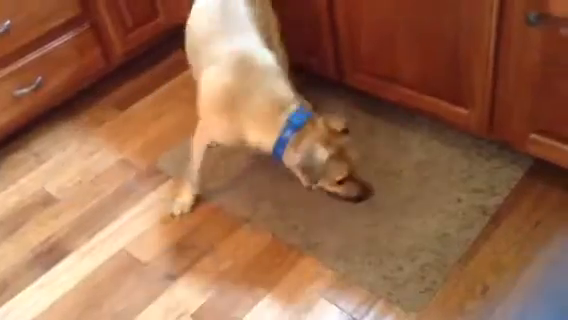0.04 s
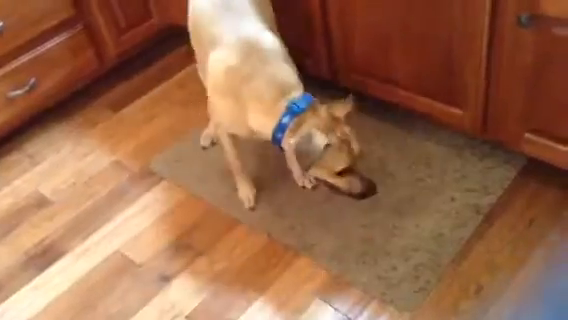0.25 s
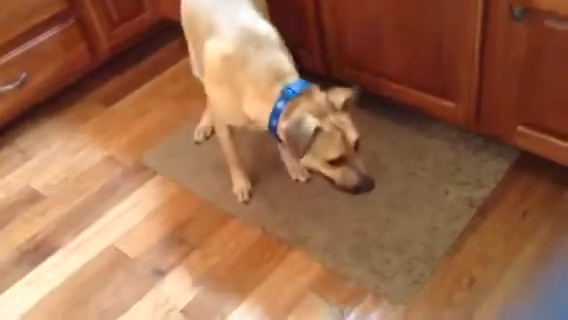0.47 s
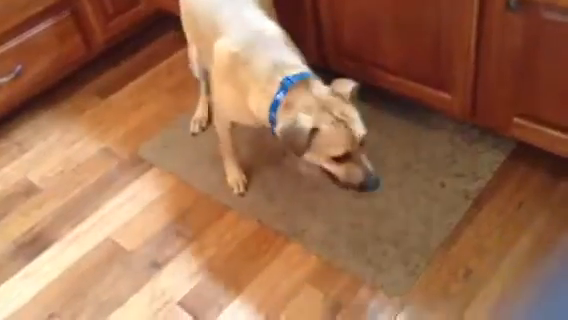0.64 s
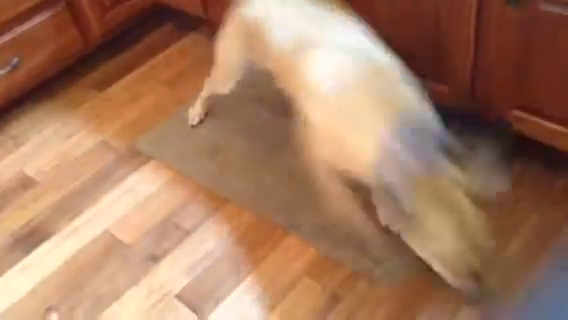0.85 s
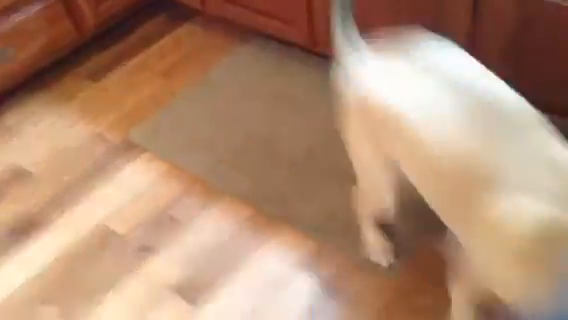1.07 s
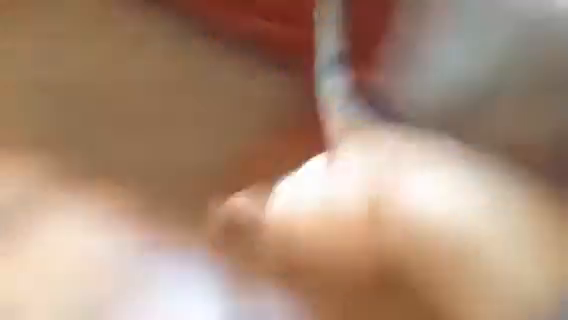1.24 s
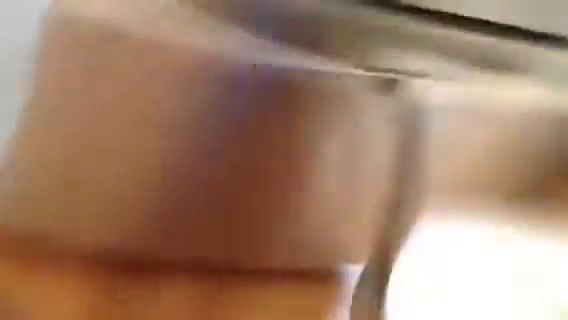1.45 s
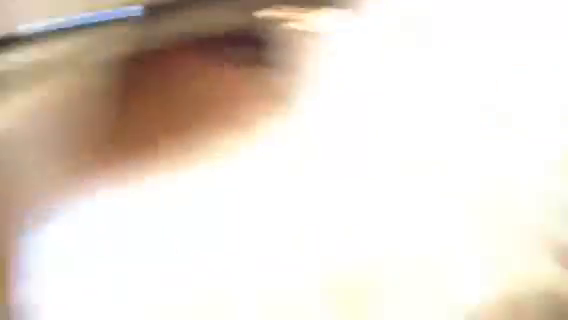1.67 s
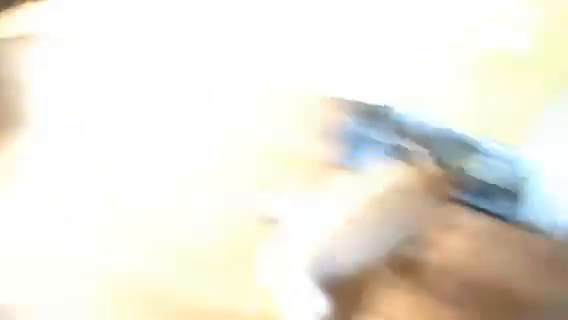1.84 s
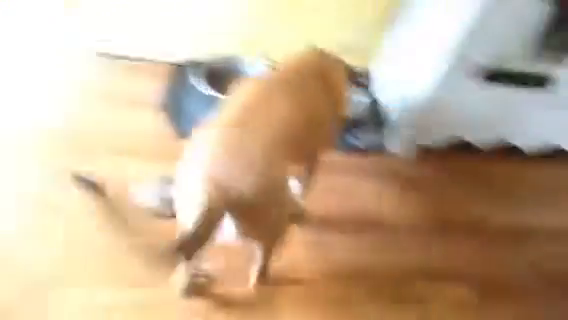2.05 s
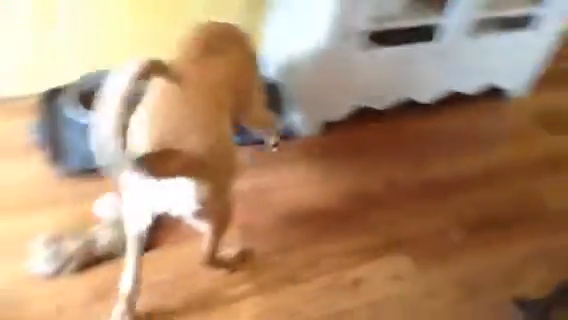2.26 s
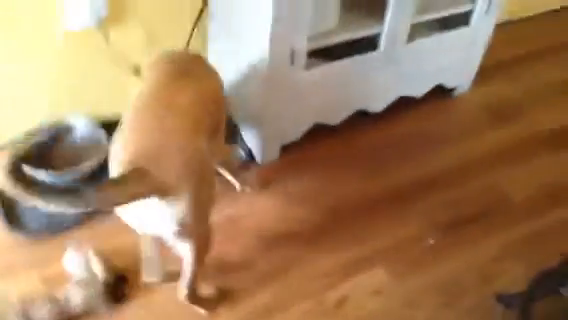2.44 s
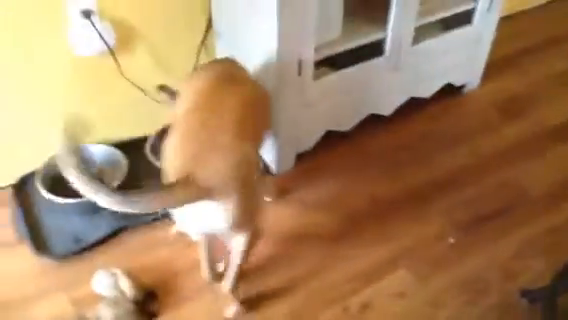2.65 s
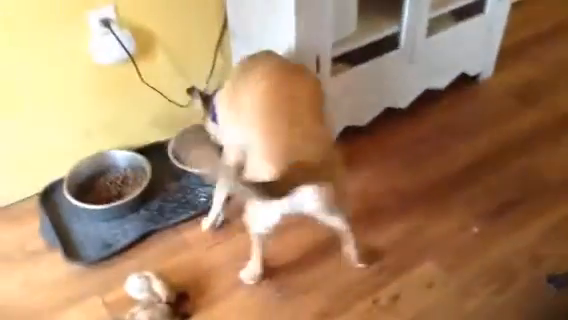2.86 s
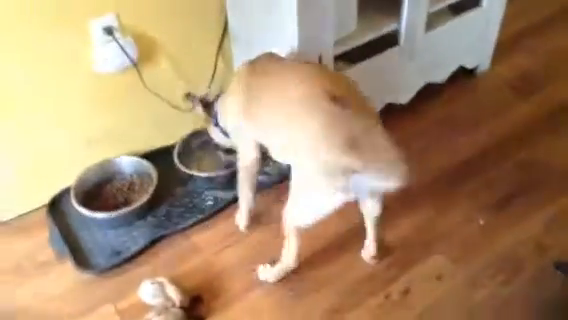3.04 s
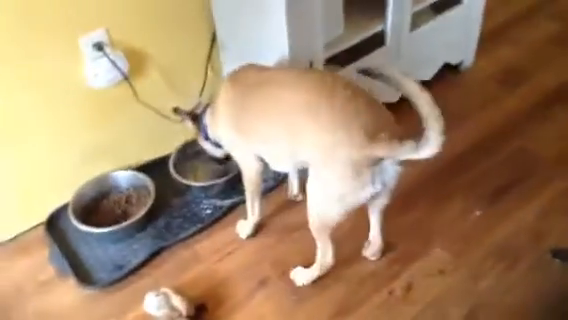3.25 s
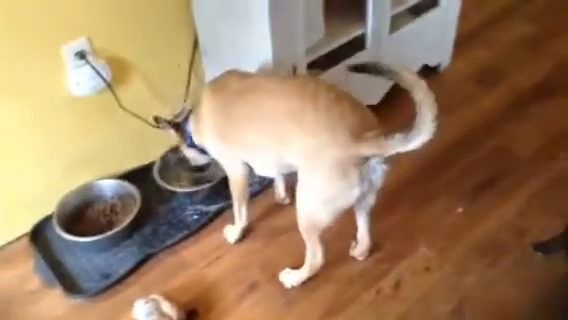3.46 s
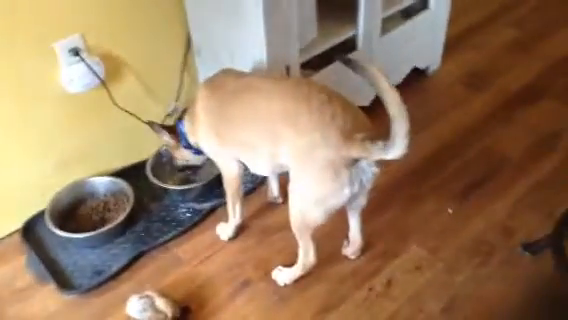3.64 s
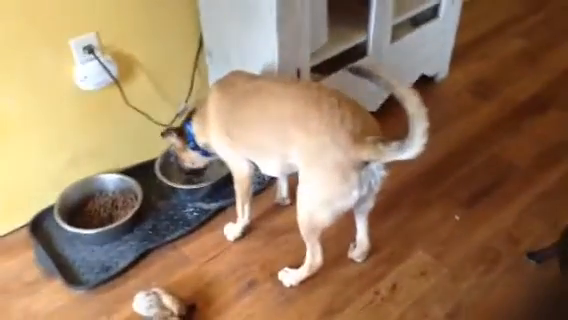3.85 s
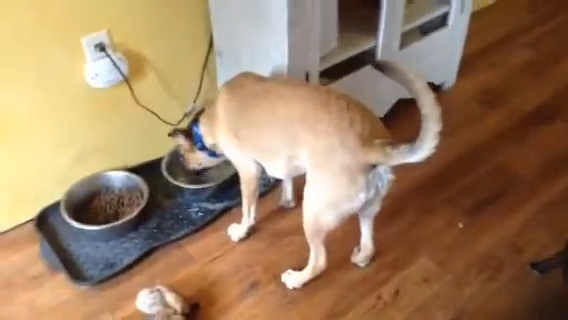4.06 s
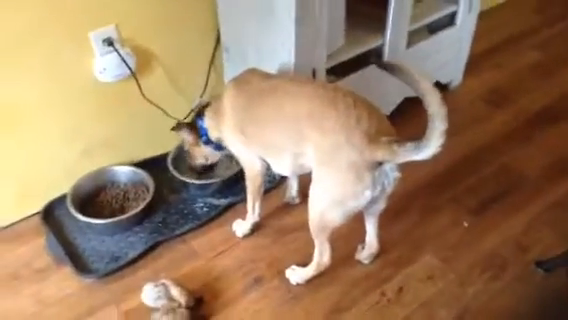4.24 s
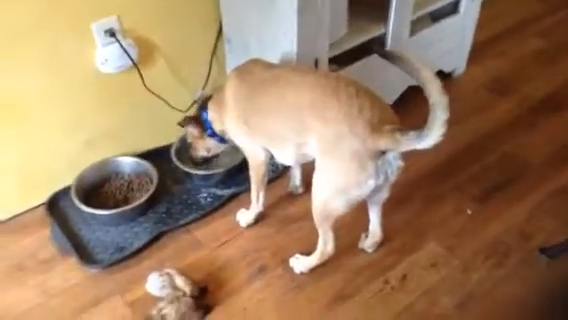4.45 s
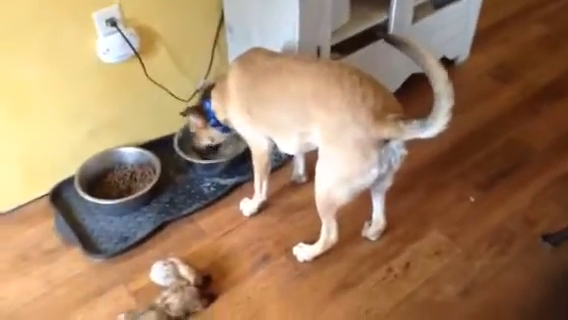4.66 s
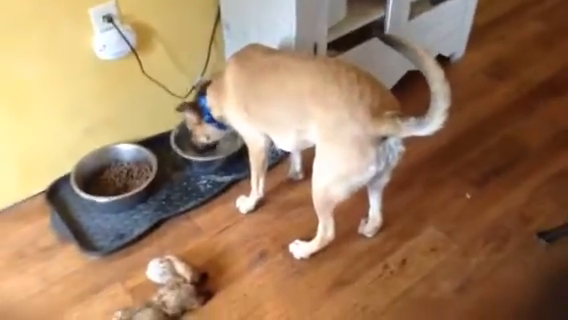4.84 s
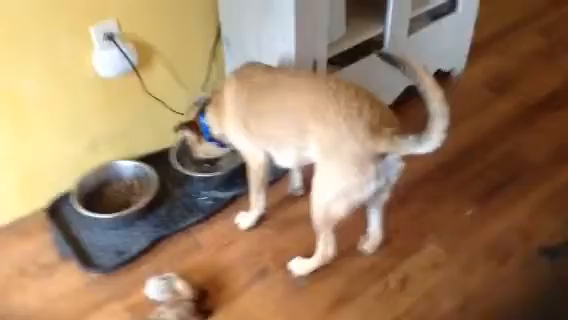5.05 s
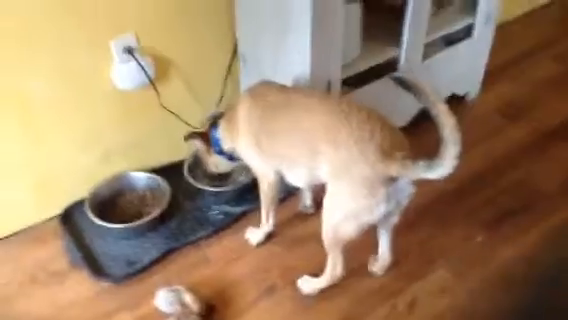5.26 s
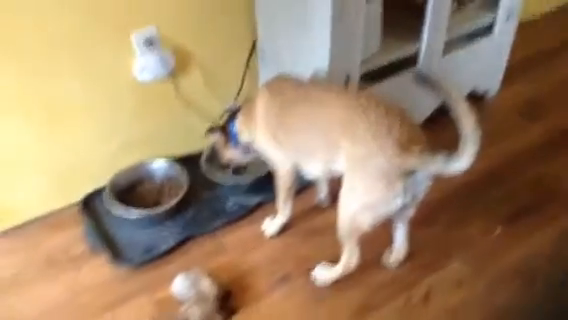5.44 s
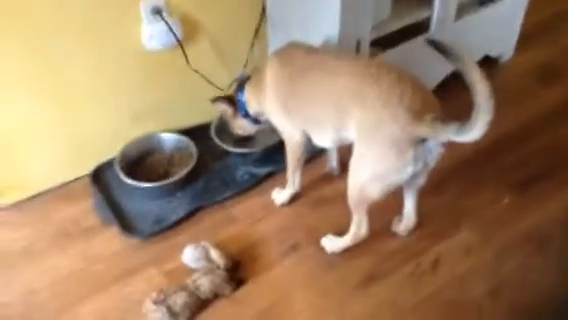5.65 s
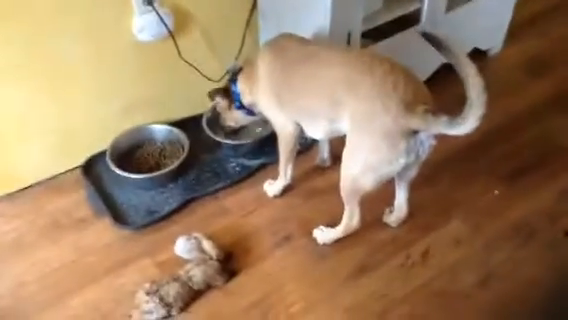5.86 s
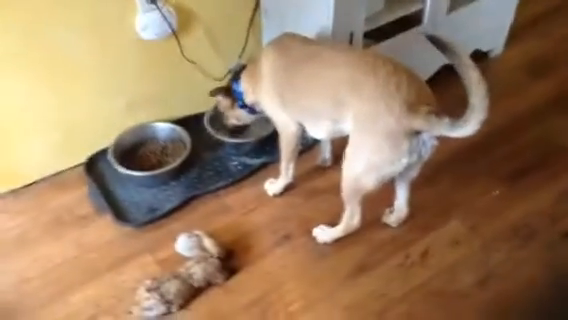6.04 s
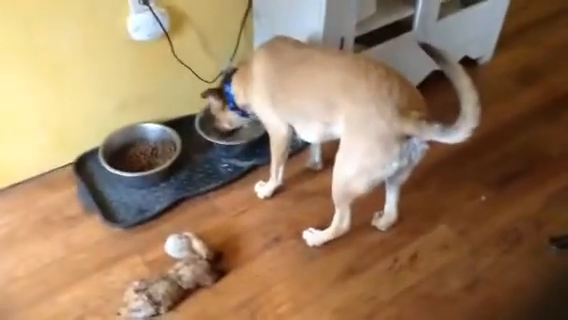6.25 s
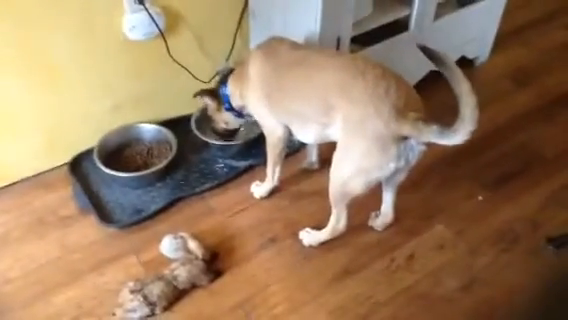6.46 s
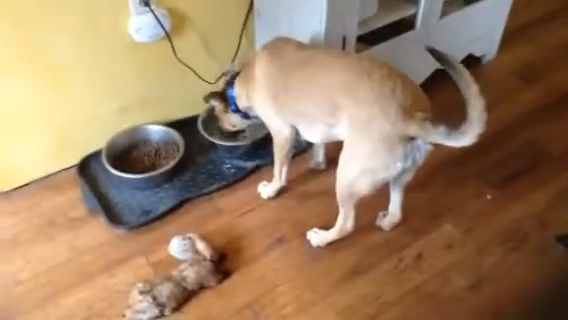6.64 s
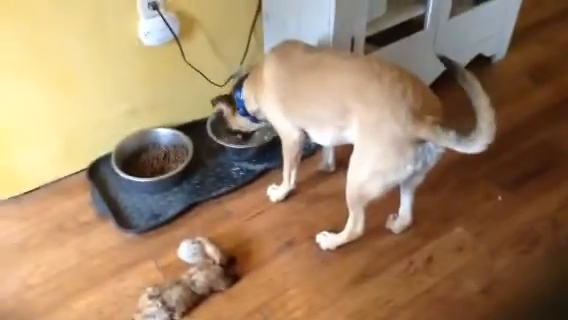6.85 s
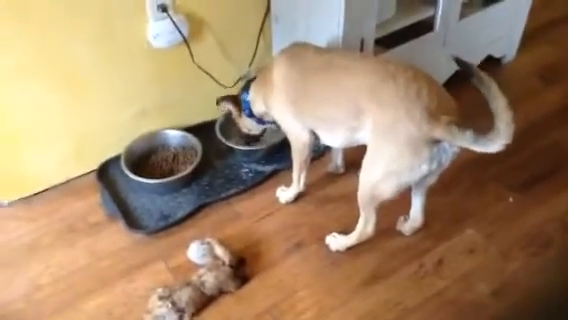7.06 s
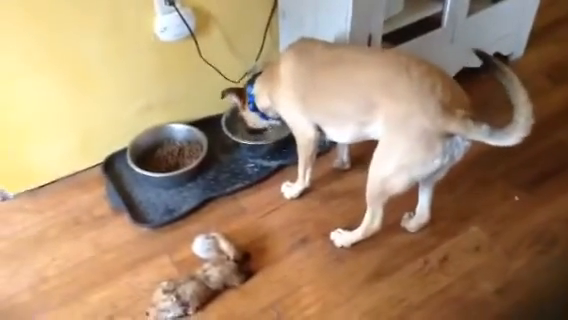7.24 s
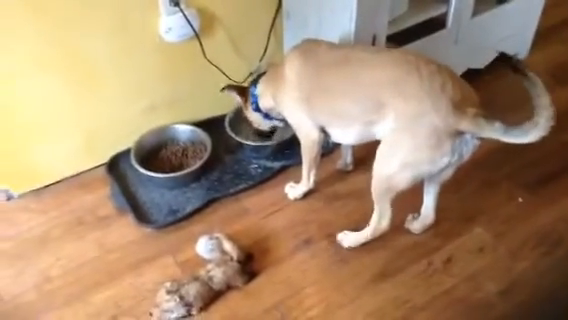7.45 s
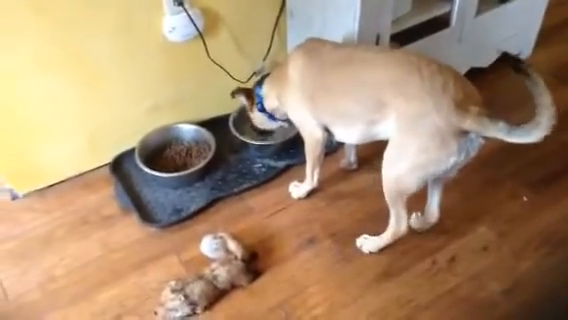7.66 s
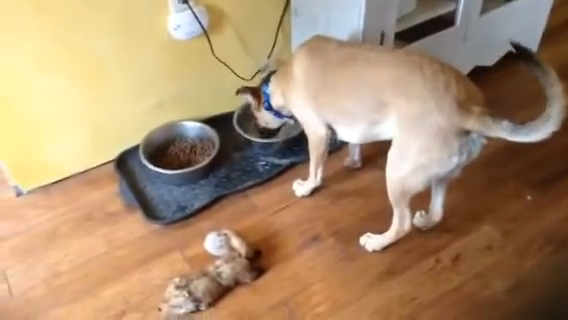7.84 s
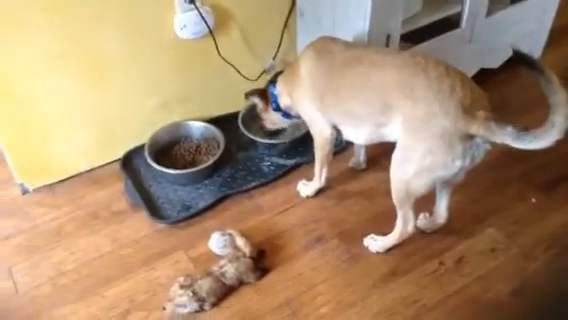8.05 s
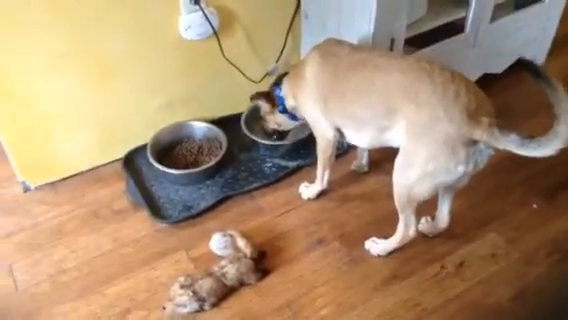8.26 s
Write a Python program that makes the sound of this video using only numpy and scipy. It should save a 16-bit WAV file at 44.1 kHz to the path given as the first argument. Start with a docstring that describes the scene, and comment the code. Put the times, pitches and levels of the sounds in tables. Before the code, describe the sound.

In a hard, lively kitchen, a dog shuffles softly on a mat, then bolts over wooden boards with heavy thumps, bright claw scrapes and a brief tag tinkle. After a short lull it laps water from a small metal bowl in quick, plopping slurps. A faint appliance hum stays below; the hand-held microphone picks up ticks and bumps.

```python
"""Dog drinking in a kitchen

A dog shuffles on a mat, scrambles over a wooden kitchen floor and laps water from a steel bowl.
Paws ring the board modes, skids and claws are dense random clicks, a tag is a few dying sines.
A lap is a slap of the tongue and a pull that traps air pockets, sines of rising pitch, amid spray and fizz.
The hard room is a noise tail that draws each sound out; an appliance hums below in wavering sines.
The hand-held microphone picks up dry ticks, knocks, hollow bumps and a brushing rustle from close by."""
import sys
import numpy as np
from scipy import signal
from scipy.fft import rfft, irfft, next_fast_len
from scipy.io import wavfile
from scipy.ndimage import uniform_filter1d

SR = 44100
rng = np.random.default_rng(int(sys.argv[2]) if len(sys.argv) > 2 else 0)


def decibels_to_gain(level_db):
    """Convert a level in decibels to a linear amplitude gain (20 dB per decade)."""
    exponent = np.asarray(level_db, float) / 20
    return 10 ** exponent


def dump_mix(stems):
    """Bounce the given channels to the path in sys.argv[1] as a 16-bit WAV at rate SR."""
    frames = np.atleast_2d(stems).T  # one column per channel
    limited = np.clip(frames, -1, 1)  # hard clip at full scale
    pcm = np.round(limited * 32767).astype(np.int16)
    wavfile.write(sys.argv[1], SR, pcm)


N = 366030   # samples


def rms_one(x):
    """Scale to unit rms."""
    return x / np.sqrt(np.mean(x ** 2) + 1e-20)


def peak_one(x):
    """Scale to unit height."""
    return x / (np.abs(x).max() + 1e-20)


def crest_rms(x):
    """Scale a burst to unit rms over its first 10 ms."""
    return x / np.sqrt(np.mean(x[:SR // 100] ** 2) + 1e-20)


def in_time(rows):
    """Columns of a level curve at every sample; silent outside it."""
    s, *columns = np.transpose(rows)
    t = np.arange(N) / SR
    return [np.interp(t, s, column, left=-200, right=-200) for column in columns]


def at_hz(points, hz):
    """Read a table on a log-frequency axis."""
    table_hz, db = np.array(points)[:, 0], np.array(points)[:, 1]
    return np.interp(np.log(hz), np.log(table_hz), db)


def colour(x, spectrum):
    """Shape a steady stream by a spectrum; rms 1."""
    size = next_fast_len(len(x))
    hz = np.arange(size // 2 + 1) * SR / size + 1
    shaped = rfft(x, size) * decibels_to_gain(at_hz(spectrum, hz))
    return rms_one(irfft(shaped, size)[:len(x)])


def band(x, low_hz, high_hz):
    """Butterworth band-pass."""
    edges_hz = [low_hz, min(high_hz, SR / 2.1)]
    return signal.sosfilt(signal.butter(2, edges_hz, "band", fs=SR, output="sos"), x)


def one_sided(x, order, hz, side):
    """Butterworth filter that keeps the "low" or the "high" side of a frequency."""
    return signal.sosfilt(signal.butter(order, hz, side, fs=SR, output="sos"), x)


def grains(per_s, spread_db, size=N):
    """Random clicks of random sign, a few much larger than the rest."""
    sizes = decibels_to_gain(spread_db * np.minimum(rng.exponential(1, size), 5))
    signs = rng.choice([-1, 1], size)
    return sizes * signs * (rng.random(size) < per_s / SR) + 1e-18


def ringing(hz, t60, rise=0., swell_s=0.000086, size=6000):
    """A dying sine that swells in quickly; its pitch climbs by the share rise over its t60."""
    t = np.arange(size) / SR
    tone = np.sin(2 * np.pi * hz * (t + rise * t ** 2 / (2 * t60)))
    return tone * decibels_to_gain(-60 * t / t60) * (1 - np.exp(-t / swell_s))


def burst(length_s, size=6000):
    """Envelope with a fast rise that falls 20 dB in length_s."""
    t = np.arange(size) / SR
    return (1 - np.exp(-t / 0.0015)) * decibels_to_gain(-20 * t / max(length_s, .002))


def swells(times, levels_db, rises_s, holds_s, fade_db_per_s):
    """Level in dB of overlapping events that rise, hold and fade; their powers add."""
    t, power = np.arange(0, N + 32, 32) / SR, 1e-20
    for s, db, rise_s, hold_s in np.broadcast(times, levels_db, rises_s, holds_s):
        rise = np.clip((t - s) / max(rise_s, .001), 0, 1)
        fade_db = fade_db_per_s * np.maximum(t - s - rise_s - hold_s, 0)
        power = power + (rise * decibels_to_gain(db - fade_db)) ** 2
    return np.interp(np.arange(N) / SR, t, 10 * np.log10(power))


def add(out, s, piece):
    """Mix a piece in at a time."""
    i = max(round(s * SR), 0)
    out[i:i + len(piece)] += piece[:N - i]


# air noise of the room: (frequency [Hz], density [dB per Hz, relative])
AIR = [(18, -61), (30, -31), (75, -28), (174, 2), (364, 1), (600, -9.5), (702, -5), (866, -5), (1250, -10),
       (2350, -10.5), (3220, -17.5), (13300, -24.5), (14800, -22.5), (16000, -43)]
# appliance hum lines, before the turn: (frequency [Hz], level [dB rms])
HUM = [(120, -76), (275, -66), (365, -67), (705, -69.5)]
# the microphone turns towards the appliance and away: (time [s], gain [dB])
TURN = [(0, 1.5), (1.3, -2), (2.2, 1), (8.3, -1.5)]


def room_tone():
    """Steady air noise and a hum whose lines waver a little in level and phase."""
    t = np.arange(N) / SR
    out = decibels_to_gain(-56.5) * colour(rng.standard_normal(N), AIR)
    for hz, db in HUM:
        waver = rms_one(uniform_filter1d(rng.standard_normal(N), size=6000))
        line = np.sqrt(2) * np.sin(2 * np.pi * hz * t + 0.63 * waver)
        out += decibels_to_gain(db + in_time(TURN)[0]) * (1 + 0.17 * waver) * line
    return out


# paws landing on the boards:
# (time [s], thump level [dB], thump pitch [Hz], board knock level [dB], favoured knock pitch [Hz])
PAWS = [(0.0, -51, 327, -32.5, 800), (.04, -55, 296, -37, 1190), (.809, -27, 223, -22, 1360),
        (1.033, -35, 353, -37.5, 724), (1.101, -33, 196, -32, 3000), (1.157, -24, 246, -62, 540),
        (1.429, -18.5, 236, -27.5, 540), (1.446, -20, 180, -21, 540), (1.466, -41, 220, -24, 1500),
        (1.582, -24.5, 308, -25, 540), (1.664, -23, 204.5, -14, 730), (1.794, -28, 316, -25.5, 990),
        (1.829, -36, 169.5, -39, 1000), (2.143, -41, 336, -40, 1280)]
# modes of the wooden boards: (frequency [Hz], level [dB], t60 [s])
BOARDS = [(540, -21, 0.052), (730, -15, 0.021), (1030, -5.5, 0.0094), (1220, -1.5, 0.014),
          (1470, -5.5, 0.025), (1830, 5.5, 0.0051), (2260, 0, 0.0057), (3100, -27, 0.013)]


def paws():
    """Each landing is a low thump and a knock that rings the modes of the boards."""
    thump_cycles, thump_swell_s = 10, 0.0037   # cycles to fall 60 dB
    out = np.zeros(N)
    for s, thump_db, hz, knock_db, knock_hz in PAWS:
        boards = 0
        for (mode_hz, db, t60), strength_db in zip(BOARDS, rng.normal(0, 3.8, len(BOARDS))):
            # modes far from the pitch that the contact favours ring less
            loss_db = 26.0 * abs(np.log2(mode_hz / knock_hz))
            boards = boards + decibels_to_gain(db + strength_db - loss_db) * ringing(mode_hz, t60)
        contact = grains(1500, 3.6, size=600) * burst(0.0069, size=600)   # toes do not land together
        contact[0] = 1
        thump = 0
        for ratio, share in [(.75, 0.29), (1, 1), (1.45, 0.35)]:
            thump = thump + share * ringing(ratio * hz, thump_cycles / hz, swell_s=thump_swell_s)
        add(out, s, decibels_to_gain(thump_db) * peak_one(thump))
        add(out, s, decibels_to_gain(knock_db) * peak_one(signal.fftconvolve(boards, contact)))
    return one_sided(out, 2, 125, "high")   # the boards radiate little deep bass


# pads and claws skidding:
# (time of first grip [s], rise [s], hold [s], rumble in the boards [dB], scratch level [dB])
SKIDS = [(0.0, 0.015, 0.057, -61, -52), (0.14, 0.038, 0.018, -73, -49.5), (0.311, 0.03, 0.056, -56, -62.5),
         (0.532, 0.086, 0.015, -52.5, -45.5), (0.697, 0.045, 0.043, -52.5, -58),
         (0.825, .005, 0.22, -66, -66.5), (1.008, 0.016, 0.027, -45.5, -52.5),
         (1.093, 0.011, 0.022, -49, -60), (1.156, 0.0017, 0.0085, -36, -39.5),
         (1.219, 0.0068, 0.192, -53, -49), (1.43, .008, 0.024, -32.5, -40.5),
         (1.463, 0.0049, 0.041, -50, -32), (1.579, 0.0047, 0.023, -37, -31),
         (1.656, 0.012, 0.041, -57, -31.5), (1.725, 0.033, .04, -40, -35.5),
         (1.793, 0.0035, 0.047, -47, -33), (1.86, 0.017, 0.093, -52, -45), (1.96, 0.017, 0.11, -63, -54),
         (2.138, 0.0035, 0.051, -75, -50.5), (2.236, 0.015, 0.063, -76, -58),
         (2.393, 0.022, 0.069, -59, -59), (2.488, 0.033, .03, -68, -56)]
# tone of scratching and brushing: (frequency [Hz], density [dB per Hz, relative])
SCRATCH = [(410, -12.5), (700, 0), (910, -3.5), (1120, -3), (3030, -4), (10400, -14), (14600, -19),
           (15400, -21), (16000, -51)]


def slide():
    """Dense small catches of pad and claw, and the rumble they set off in the boards."""
    fade_db_per_s = 265
    s, rise_s, hold_s, *levels = np.transpose(SKIDS)
    rumble_db, scratch_db = (swells(s, db, rise_s, hold_s, fade_db_per_s) for db in levels)
    rumble = rms_one(band(band(grains(600, 3.5), 105, 550), 122, 610))
    scratch = colour(grains(9000, 3.6), SCRATCH)
    return decibels_to_gain(rumble_db) * rumble + decibels_to_gain(scratch_db) * scratch


def claws():
    """A sudden skid opens with a rasp of claws, a short burst of bright clicks."""
    over_scratch_db, loss_db_per_s = 11, 306   # the slower the rise, the weaker the rasp
    out = np.zeros(N)
    for s, rise_s, _, _, scratch_db in SKIDS:
        rasp = band(grains(9700, 1.1, size=6000), 3350, 12100) * burst(0.017)
        rasp_db = scratch_db + over_scratch_db - loss_db_per_s * rise_s
        add(out, s, decibels_to_gain(rasp_db) * peak_one(rasp))
    return out


# collar tag touching its ring: (time [s], peak level [dB])
TAG = [(0.7383, -43), (1.2217, -24.5), (1.277, -31), (1.2913, -26.5)]
# modes of the tag: (frequency [Hz], level [dB], t60 [s])
TAG_MODES = [(3000, -1, 0.023), (3180, 1, .02), (3270, 9, 0.024), (3420, 2, .02), (6900, 5, 0.013)]


def tag():
    """A small metal plate, struck lightly, rings in a few high modes."""
    plate = peak_one(sum(decibels_to_gain(db) * ringing(hz, t60) for hz, db, t60 in TAG_MODES))
    out = np.zeros(N)
    for s, peak_db in TAG:
        add(out, s, decibels_to_gain(peak_db) * plate)
    return out


# dull knocks close by: (time [s], peak level [dB], pitch [Hz], ring to -60 dB [cycles])
KNOCKS = [(0.882, -22, 1430, 3.2), (2.258, -32.5, 212, 3.8), (2.859, -49, 308, 12), (3.853, -30, 623, 1.5),
          (3.879, -38, 288, 4.4), (4.128, -44, 460, 14), (5.021, -20, 600, 0.57), (5.026, -32, 494, 1),
          (5.06, -20.5, 506, 0.44), (5.0635, -14, 482, 4.4), (5.066, -28, 177, 5.4),
          (5.111, -29.5, 800, 3.1), (5.553, -40, 300, 12), (6.242, -39, 434, 6.8), (6.974, -37, 275, 24),
          (7.729, -38.5, 265, 11)]
# dry ticks close by: (time [s], click level before the band-pass [dB])
TICKS = [(0.8806, -31), (1.3227, -24), (1.9439, -35), (2.0636, -46), (2.2372, -34), (2.2607, -28),
         (3.8524, -34), (4.075, -27), (4.9234, -33), (5.4524, -33), (5.471, -42), (5.4844, -42),
         (5.5917, -29), (5.6599, -33), (5.7118, -36), (5.646, -32), (5.7462, -39), (5.7707, -38),
         (5.794, -33), (6.0776, -42), (6.134, -26), (6.3275, -44), (7.1438, -34), (8.269, -36)]
# cloth or skin brushing close to the microphone: (time [s], level [dB])
RUSTLE = [(4.88, -54), (5.054, -49.5), (5.062, -44.5), (5.106, -45.5), (5.146, -35.5), (5.166, -52),
          (5.258, -49), (5.356, -81)]


def close_by():
    """Knocks are a rounded push with a short ring, ticks a bright snap, the rustle dense small catches."""
    out = np.zeros(N)
    snaps = decibels_to_gain(-52) * grains(2, 2)   # faint ticks, two a second on average
    for s, peak_db, hz, cycles in KNOCKS:
        knock = ringing(hz, cycles / hz, swell_s=.5 / hz)
        knock += 0.19 * ringing(3.12 * hz, cycles / hz / 2)
        knock += 0.07 * ringing(6.4 * hz, cycles / hz / 3)
        add(out, s, decibels_to_gain(peak_db) * peak_one(knock))
    for s, click_db in TICKS:
        add(snaps, s, decibels_to_gain(click_db) * np.ones(1))
    rustle = decibels_to_gain(in_time(RUSTLE)[0]) * colour(grains(5000, 3.8), SCRATCH)
    return out + 1.75 * band(snaps, 4100, 17000) + rustle


def pockets(hz, length_s, cycles, scatter, count):
    """A few air pockets of like size close one after another, each ringing with rising pitch."""
    out = np.zeros(9000)
    for k, (late, size, db) in enumerate(rng.random((count, 3))):
        follows = k > 0   # the first pocket is on time, on pitch and loudest
        pitch = hz * (1 + scatter * (size - .5) * follows)
        i = int(late * follows * np.clip(length_s, 0, .1) * SR)
        ring = ringing(pitch, cycles / pitch, rise=0.068, swell_s=.6 / pitch, size=4000)
        out[i:i + 4000] += decibels_to_gain(-9 * db * follows) * ring
    return peak_one(out)


# single droplets and small bubbles that stand out: (time [s], peak level [dB], pitch [Hz])
DROPS = [(2.533, -44.5, 1740), (2.591, -41.5, 3090), (2.835, -39, 10000), (2.896, -40, 2060),
         (3.094, -37.5, 3130), (3.104, -36.5, 7200), (3.336, -48, 6900), (3.106, -39, 2070),
         (3.445, -33.5, 1850), (3.448, -35.5, 2450), (3.456, -39.5, 3970), (3.463, -28.5, 3980),
         (3.715, -37, 5460), (3.781, -37, 9000), (3.842, -39.5, 4800), (4.056, -36.5, 3350),
         (4.068, -37.5, 2140), (4.127, -38.5, 3100), (4.414, -44, 5100), (4.424, -40, 2060),
         (4.845, -44, 2110), (4.847, -38, 7150), (4.524, -38, 11500), (4.526, -43, 3700),
         (4.075, -40, 11100), (3.423, -43, 7800), (4.785, -47, 3830), (4.874, -46, 3850),
         (5.485, -50, 2620), (6.147, -49, 1850), (6.169, -45, 3960), (5.811, -36, 3670), (5.896, -38, 1710),
         (5.902, -39, 4140), (5.905, -39, 8300), (6.246, -31, 2000), (6.559, -36, 2610), (6.672, -37, 2200),
         (6.673, -40, 4950), (6.972, -32, 2130), (6.981, -33.5, 3660), (7.234, -36, 1950),
         (7.274, -40, 1900), (7.305, -38.5, 4760), (7.636, -35, 1910), (7.643, -33, 2530),
         (7.75, -35.5, 2240), (7.972, -41, 4770), (7.994, -38, 3020), (8.065, -39, 11400),
         (8.11, -40, 3820), (8.22, -45, 4400)]
# tongue slaps and pulls, for the drops, slosh and laps; the three at 5.07-5.21 s are hollow bumps
# and rustling close to the microphone, voiced the same way:
# (time [s], air pocket level [dB], its pitch [Hz], fizz level [dB], low push [dB])
LAPS = [(2.591, -46, 1540, -47.5, -50), (2.749, -60, 1200, -57.5, -50), (2.811, -54, 1280, -59, -64),
        (2.857, -45, 1120, -49, -45), (2.889, -42, 830, -55.5, -46.5), (3.097, -53, 1400, -44, -61),
        (3.14, -51, 1310, -46, -66), (3.189, -65, 1360, -56, -45.5), (3.372, -47.5, 890, -49.5, -56),
        (3.446, -33, 1044, -50.5, -41.5), (3.717, -57, 1230, -47.5, -72), (3.798, -52, 853, -46.5, -49),
        (3.846, -47, 1030, -55, -45), (4.024, -58, 1420, -53, -57), (4.059, -66, 1000, -45, -60),
        (4.12, -41, 1220, -47, -40), (4.425, -33, 1110, -45, -49), (4.451, -47, 980, -68, -58),
        (4.528, -39.5, 1330, -49.5, -43), (4.763, -52, 1060, -46.5, -65), (4.843, -37, 1230, -42.5, -41.5),
        (5.065, -34, 1010, -53, -62), (5.142, -38, 1130, -46.5, -63), (5.211, -46, 1210, -52.5, -54),
        (5.473, -45.5, 1200, -45, -51), (5.495, -42.5, 1030, -48.5, -63), (5.552, -49, 1040, -42, -43),
        (5.591, -44, 1180, -48.5, -61), (5.811, -37, 950, -45, -56), (5.9, -40.5, 1104, -46, -46),
        (6.151, -50, 910, -47, -50), (6.243, -38.5, 1160, -47.5, -36.5), (6.266, -33, 980, -62, -46.5),
        (6.564, -42.5, 925, -48.5, -46), (6.607, -46, 1020, -55, -44), (6.675, -39, 1240, -52.5, -44.5),
        (6.887, -40.5, 1046, -55.5, -64), (6.941, -41, 1100, -49.5, -51), (6.978, -39, 930, -46, -45.5),
        (6.992, -36.5, 1056, -50, -43), (7.209, -58, 1080, -47, -77), (7.236, -48, 945, -50, -59),
        (7.262, -39.5, 1100, -53, -46), (7.305, -34, 1250, -48.5, -41), (7.63, -40, 1310, -51.5, -53),
        (7.655, -37.5, 1330, -48, -74), (7.756, -31, 1345, -50, -52), (7.785, -58, 1380, -66, -57),
        (7.82, -60, 1470, -77, -52), (7.976, -51, 1330, -50, -52), (8.013, -44.5, 1080, -49.5, -53),
        (8.064, -33.5, 1210, -45, -52), (8.072, -34, 1274, -55, -54), (8.101, -58, 1330, -72, -60),
        (8.14, -51, 1450, -74, -56), (8.218, -65, 1400, -74, -60)]


def drops():
    """Each drop traps a few small bubbles; one lesser drop falls at random after each row of LAPS."""
    low_hz, high_hz = 1855, 9000   # pitch range of the lesser drops
    falling = list(DROPS)
    for (s, _, _, fizz_db, _), (late, size) in zip(LAPS, rng.random((len(LAPS), 2))):
        falling.append((s + 0.068 * late, fizz_db, low_hz * (high_hz / low_hz) ** size))
    out = np.zeros(N)
    for s, peak_db, hz in falling:
        add(out, s, decibels_to_gain(peak_db) * pockets(hz, .024, cycles=36.0, scatter=.13, count=4))
    return out


# how fine the spray and fizz sound: (time [s], gain of the spray and of the fizz's top treble [dB])
FINENESS = [(2.6, 1.5), (2.87, 3.5), (3.1, 0), (3.42, -2.5), (3.76, 3.5), (4.08, -5), (4.43, 1.5),
            (4.54, 5), (4.77, -5), (4.85, 1), (5.15, 8.5), (5.52, -2), (5.85, -4), (6.2, -4), (6.57, 3),
            (6.69, 10.5), (6.9, 3), (7.0, -2), (7.27, -4.5), (7.66, 4), (7.8, 4), (8.05, 0.5)]


def fineness(s):
    """Treble weight of the spray and fizz at given times, dB."""
    return np.interp(s, *np.transpose(FINENESS))


def above_bowl(x):
    """The small bowl radiates little below its cut-off."""
    return one_sided(x, 6, 752, "high")


def bubbles(low_hz, high_hz, per_s, spread_db, cycles, level_db):
    """Random bubbles dealt to pitches spread evenly in octaves; level_db(hz) weighs the sizes."""
    born, dealt, out = grains(per_s, spread_db), rng.integers(0, 18, N), 0
    for k, hz in enumerate(np.geomspace(low_hz, high_hz, 18)):
        r, w = decibels_to_gain(-60 * hz / (cycles * SR)), 2 * np.pi * hz / SR   # decay and turn per sample
        struck = born * (dealt == k) + 1e-18
        ring = signal.lfilter([0, np.sin(w)], [1, -2 * r * np.cos(w), r * r], struck)
        out = out + decibels_to_gain(level_db(hz)) * ring
    return rms_one(band(out, 0.86 * low_hz, 1.6 * high_hz))


# tone of the fizz: (frequency [Hz], density [dB per Hz, relative])
FIZZ = [(1470, 16), (2500, 1.5), (4020, -2), (4510, -5), (13700, -28), (15400, -23), (16000, -46)]


def slosh():
    """Bubbles over two octaves, tiny droplets above them and a thin hiss swell with each row of LAPS."""
    stir_rise_s, stir_hold_s = 0.005, 0.0048
    gurgle_fade_db_per_s, fizz_fade_db_per_s = 182, 167
    fizz_lead_s, fizz_rise_s = 0.031, 0.061   # in a lap the surface breaks before the tongue traps air
    t = np.arange(N) / SR
    s, air_db, _, row_fizz_db, _ = np.transpose(LAPS)
    gurgle_db = swells(s, air_db - 0.5, stir_rise_s, stir_hold_s, gurgle_fade_db_per_s)
    fizz_db = swells(s - fizz_lead_s, row_fizz_db, fizz_rise_s, stir_hold_s, fizz_fade_db_per_s)
    # dB per octave: small bubbles weigh more as fizz outweighs the air pockets
    small_db = np.clip(np.interp(t, s, 8.5 + 0.74 * (row_fizz_db - air_db)), -20, 10)
    gurgle = bubbles(836, 3280, 900, 1.3, 18.4, lambda hz: small_db * np.log2(hz / 1300))
    droplets = bubbles(2833, 14150, 1400, 0.86, 87.0,
                       lambda hz: at_hz(FIZZ, hz) + 10.3 * np.log2(hz / 3000))
    hiss = colour(grains(9000, 0.48), FIZZ)
    fizz = decibels_to_gain(-3.0) * droplets + decibels_to_gain(2.5) * hiss
    coarse, fine = (one_sided(fizz, 2, 7600, side) for side in ("low", "high"))
    # subtracted, since the two halves are in opposite phase at the crossover
    splash = coarse - decibels_to_gain(fineness(t)) * fine
    return above_bowl(decibels_to_gain(gurgle_db) * gurgle + decibels_to_gain(fizz_db) * splash)


def laps():
    """In a lap air pockets ring under the tongue, spray flies up, water is shoved against the bowl."""
    spray_db = -10   # relative to the fizz
    out, push = np.zeros(N), np.zeros(N)
    for s, pocket_db, hz, fizz_db, push_db in LAPS:
        shove = pockets(0.43 * hz, 0.022, cycles=4.4, scatter=1.0, count=3)
        trapped = pockets(hz, .018, cycles=20.0, scatter=.4, count=5)
        spray = crest_rms(band(grains(6000, 0.73, size=6000), 2400, 11200) * burst(0.0088))
        add(push, s, decibels_to_gain(push_db) * shove)
        add(out, s, decibels_to_gain(pocket_db) * trapped)
        add(out, s, decibels_to_gain(fizz_db + spray_db + fineness(s)) * spray)
    return above_bowl(out) + push


# how long the kitchen rings: (frequency [Hz], t60 [s])
ROOM_T60 = [(100, 0.31), (400, 0.42), (1200, 0.47), (4000, 0.6), (12000, 0.42)]


def kitchen(x):
    """Dense reflections: octave bands of noise, each dying at its own rate, after a short gap."""
    t, tail = np.arange(int(.9 * SR)) / SR, 0
    for low_hz in 62.5 * 2. ** np.arange(8):
        noise = band(rng.standard_normal(len(t)), low_hz, 2 * low_hz)
        tail = tail + noise * decibels_to_gain(-60 * t / at_hz(ROOM_T60, np.sqrt(2) * low_hz))
    tail = tail * np.clip((t - .004) / 0.0014, 0, 1)
    tail = tail * (1 + 1.55 * np.exp(-t / 0.0044))   # the first bounces are stronger
    return signal.fftconvolve(x, tail / np.sqrt(np.sum(tail ** 2)))[:N]


def scene():
    """Sharp events drive the room hardest; light plinks beam more directly; ticks and knocks close by send only
    a little to the room."""
    hits = decibels_to_gain(-0.5) * (paws() + claws()) + decibels_to_gain(1.0) * laps()
    plinks = tag() + drops()
    moving = decibels_to_gain(-1.5) * slide() + decibels_to_gain(-5.0) * slosh()
    near = close_by()
    to_walls = decibels_to_gain(2.0) * hits + decibels_to_gain(-4) * plinks + decibels_to_gain(-11.5) * moving + decibels_to_gain(-10.5) * near
    return (hits + plinks + moving + near + kitchen(to_walls) + room_tone())[None]


def roll_off(x):
    """The treble ends steeply here."""
    return signal.sosfilt(signal.butter(12, 16480, fs=SR, output="sos"), x)


def record(dry):
    """A small microphone loses the deep bass but for a trace of rumble and mains tone; the treble is cut."""
    mains_hz, mains_db, rumble_db = 61, -100, -86   # levels before the turn
    thin = one_sided(dry, 4, 125, "high")
    rumble = rms_one(band(rng.standard_normal(N), 47, 88))
    mains = np.sqrt(2) * np.sin(2 * np.pi * mains_hz * np.arange(N) / SR)
    deep = decibels_to_gain(rumble_db) * rumble + decibels_to_gain(mains_db) * mains
    treble_cut = signal.ellip(8, .5, 32, 15400, fs=SR, output="sos")
    mix = signal.sosfilt(treble_cut, thin + decibels_to_gain(in_time(TURN)[0]) * deep)
    return roll_off(mix)


dry = scene()
out = record(dry)
dump_mix(out)
```